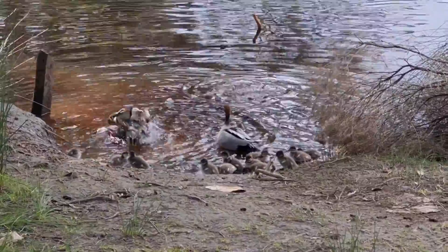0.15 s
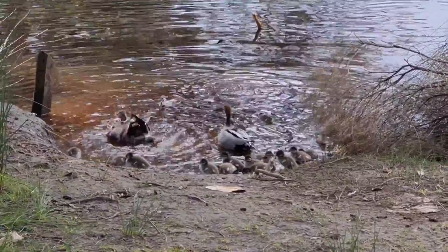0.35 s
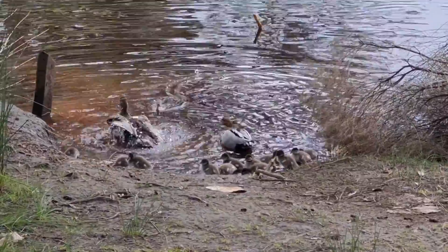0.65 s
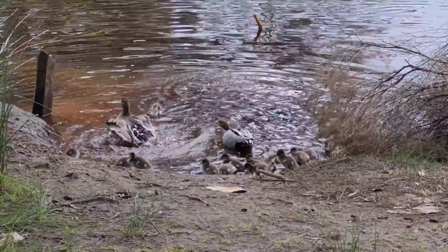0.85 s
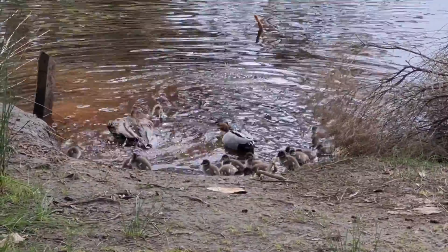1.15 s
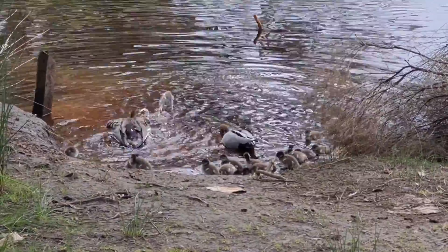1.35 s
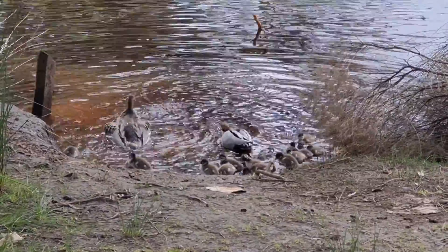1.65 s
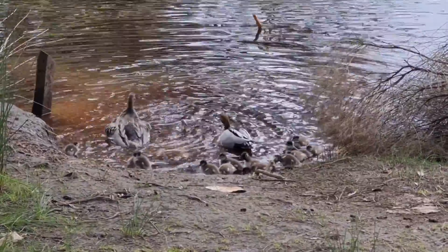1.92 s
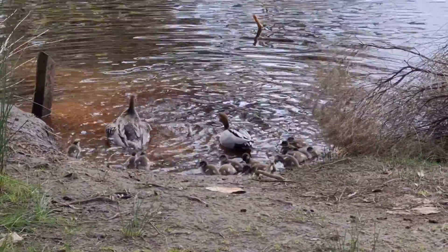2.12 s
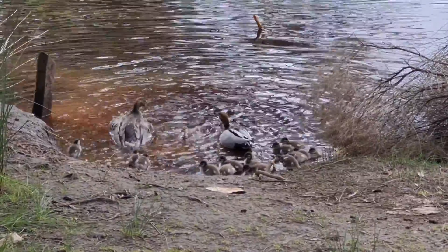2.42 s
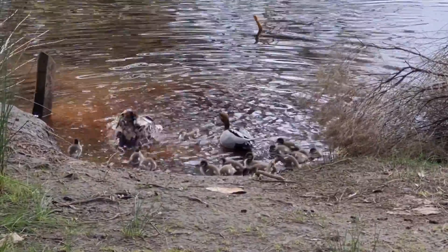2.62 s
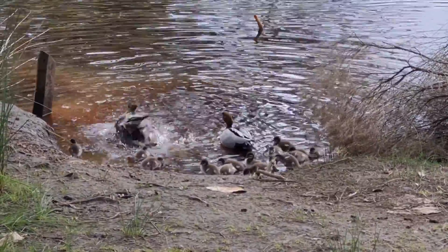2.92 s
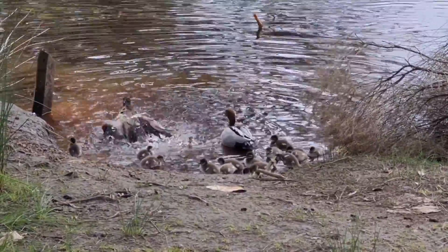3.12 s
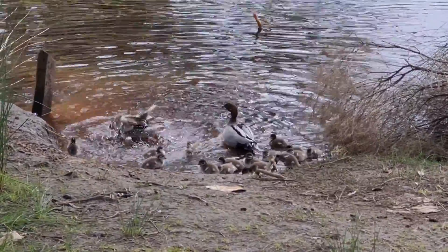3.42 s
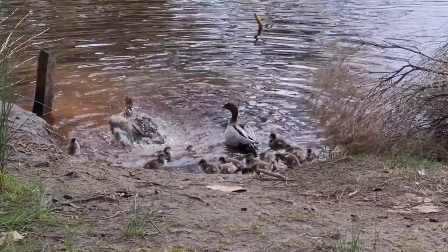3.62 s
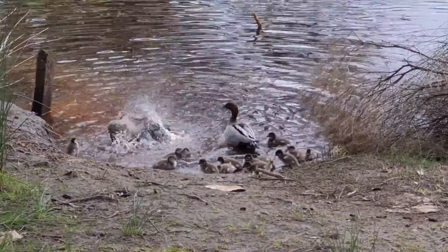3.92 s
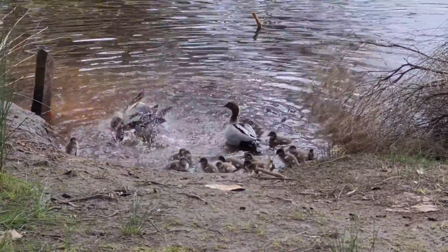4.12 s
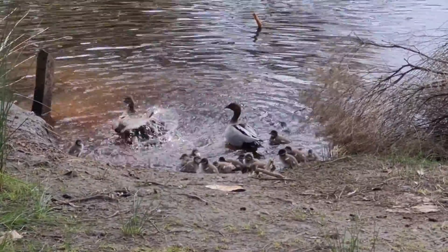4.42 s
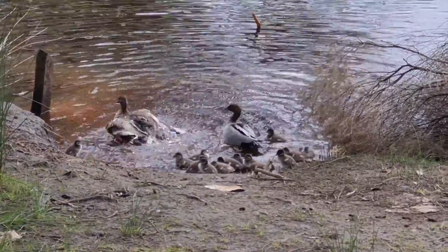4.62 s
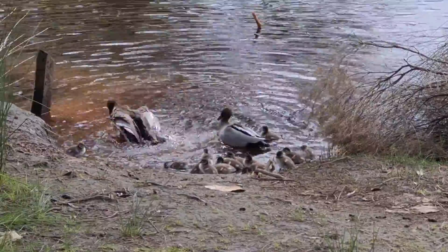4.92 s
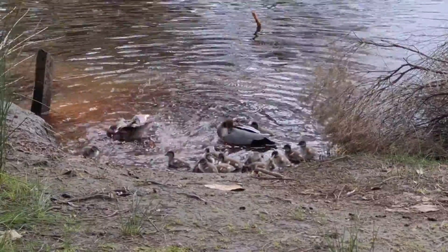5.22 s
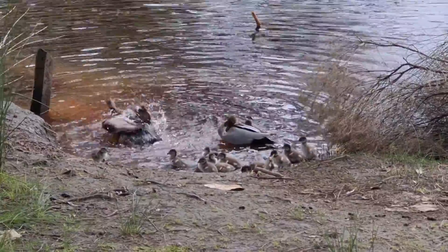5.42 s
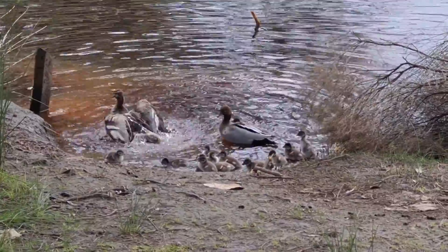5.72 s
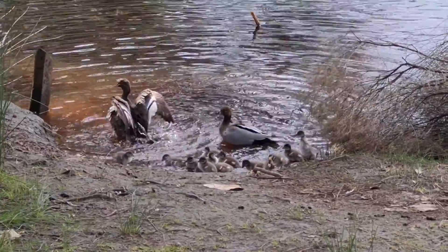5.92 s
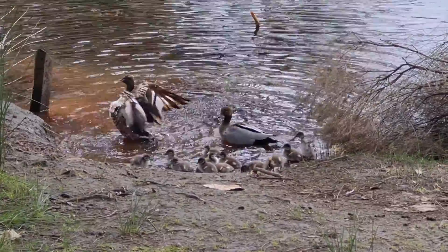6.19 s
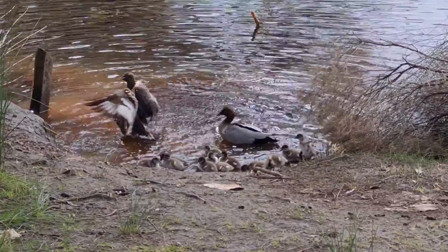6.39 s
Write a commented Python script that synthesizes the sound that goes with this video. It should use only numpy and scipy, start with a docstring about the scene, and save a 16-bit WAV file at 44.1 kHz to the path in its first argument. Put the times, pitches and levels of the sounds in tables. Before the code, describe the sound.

A distant motor vehicle pulls away, changes gear and drones on while a duck splashes, slaps and flaps its wet wings in shallow water.

```python
"""Duck bathing at a pond's edge

A duck bathes: enveloped noise makes slosh and spray, slaps pair noise bursts with ringing air pockets.
Drips are ringing bubbles, ducklings peep as gliding sines, and wet feathers swish and sizzle as shaped noise.
Far off a motor vehicle pulls away, changes gear and drones on: summed engine orders over a rush of gas.
Its road and tyre noise fade, over distant traffic rumble and rustling reeds, all coloured noise.
The duck reaches the left channel first, while the right channel is more sensitive to much of the treble."""
import sys
import numpy as np
from scipy import signal
from scipy.fft import rfft, irfft
from scipy.io import wavfile

SR = 44100
rng = np.random.default_rng(int(sys.argv[2]) if len(sys.argv) > 2 else 0)


def generate_wav(signal):
    """Clip the signal to [-1, 1] and save it as 16-bit WAV at the path in sys.argv[1]."""
    frames = np.transpose(np.atleast_2d(signal))
    scaled = np.clip(frames, -1, 1) * 32767
    pcm = np.round(scaled).astype(np.int16)
    wavfile.write(sys.argv[1], SR, pcm)


N = 288855
TIME = np.arange(N) / SR


def amp(db):
    """Decibels to gain."""
    return 10 ** (np.asarray(db) / 20)


def unit(x):
    """Scales to rms 1."""
    return x / np.sqrt(np.mean(np.abs(x) ** 2) + 1e-20)


def follow(rows):
    """Each column of a curve table at every sample."""
    times, *columns = np.transpose(rows)
    return [np.interp(TIME, times, column) for column in columns]


def at_hz(points, hz):
    """Reads a spectrum on a log-frequency axis."""
    f, value = np.transpose(points)
    return np.interp(np.log(hz + 1), np.log(f), value)


def colour(x, tone):
    """Filters by a spectrum, keeping the power of white noise."""
    gain = unit(amp(at_hz(tone, np.fft.rfftfreq(N, 1 / SR))))
    return irfft(rfft(x) * gain, N)


def add(mix, s, sound):
    """Mixes a sound in at time s."""
    part = mix[..., max(round(s * SR), 0):][..., :sound.shape[-1]]
    part += sound[..., :part.shape[-1]]


def bell(s, length):
    """A soft rise and fall around time s."""
    return np.exp(-(2 * (TIME - s) / length) ** 2)


def swells(rows):
    """Soft bell-shaped bursts as one gain curve."""
    return sum(amp(db) * bell(s, length) for s, db, length in rows)


def drift(per_s):
    """Smooth random wandering of rms 1."""
    count = N // 100 + 2  # drawn once every 100 samples
    hz = np.fft.rfftfreq(count, 100 / SR)
    slow = irfft(rfft(rng.standard_normal(count)) * np.exp(-(hz / per_s) ** 2))
    return unit(np.interp(np.arange(N) / 100, np.arange(len(slow)), slow))


def lean(right_db):
    """Channel gains that set the right side this many dB above the left."""
    return amp(np.array([[-.5], [.5]]) * right_db)


PORT_LAG, ENGINE_LAG = 23, 14  # delay of the right channel for the duck and the engine [samples]


def ports(x, lag=PORT_LAG):
    """Sound from the left reaches the right port some samples later."""
    return np.array([x, np.pad(x, (lag, 0))[:N]])


# Stereo width of sound from all around: (frequency [Hz], likeness of the two channels [0 to 1])
CHANNEL_LIKENESS = [(60, 0.85), (130, 0.82), (290, 0.78), (640, 0.67), (1400, 0), (16000, 0)]


def air(tone):
    """Sound from all around: alike in both channels in the bass, unrelated in the treble."""
    a, b = rfft(rng.standard_normal((2, N)))
    same = np.clip(at_hz(CHANNEL_LIKENESS, np.fft.rfftfreq(N, 1 / SR)), -1, 1)
    pair = np.array([a, same * a + np.sqrt(1 - same ** 2) * b])
    return colour(irfft(pair, N), tone)


def patter(per_s, spread_db):
    """Droplet impacts at random moments and of unequal size, rms 1."""
    size = amp(spread_db * np.minimum(rng.exponential(1, N), 4))
    lands = rng.random(N) < per_s / SR
    return unit(size * rng.standard_normal(N) * lands)


def hiss(tone, per_s, spread_db, wet_db):
    """Dense tiny impacts: one share comes straight from the duck, the rest is scattered to each port on its own."""
    scattered = np.array([patter(per_s, spread_db), patter(per_s, spread_db)])
    direct = ports(patter(per_s, spread_db))
    return unit(colour(direct + amp(wet_db) * scattered, tone))


def bubble(hz, cycles, rise):
    """A pocket of air rings down, its pitch rising as it nears the surface."""
    age = np.arange(4000) / SR * hz / cycles  # in decay times
    ring = np.sin(2 * np.pi * cycles * (age + rise * age ** 2 / 2))
    return ring * np.exp(-age) * (1 - np.exp(-10 * age))


def throttle(pull, rise_s):
    """Drive builds as the throttle opens, holds, and dies back when it eases off."""
    opens, eases, _, _, ease_s, left = pull
    attack = 1 - np.exp(-(np.maximum(TIME - opens, 0) / rise_s) ** 2)
    return attack * (left + (1 - left) * np.exp(-np.maximum(TIME - eases, 0) / ease_s))


# Engine speed, climbing in low gear and sagging through the change: (time [s], crank speed [turns per s])
CRANK_SPEED = [(0, 50.75), (2.3, 60.2), (2.5, 55), (2.8, 46), (3.5, 38.8), (4.7, 39.3), (6.55, 39.1)]
# Brief dips in the drone: (middle [s], boom depth [dB], rasp depth [dB], length [s])
DRONE_DIPS = [(.41, 3, 5, .06), (.85, 4, 3, .07), (1.25, 15, 2, .09), (1.47, 4, 1, .07), (1.8, 5, 3, .22),
              (2.4, 13, 4, .12), (3.52, 11, 8, .07), (3.93, 8, 0, .45), (5.27, 8, 6, .12)]
# Rush of exhaust gas: (frequency [Hz], relative level [dB per Hz])
GAS_TONE = [(40, -23.5), (80, 3.5), (200, 0.5), (340, 2), (420, -13.5), (520, -22.5), (900, -54.5)]
# Low-gear drone swings at an even rate; a crest falls at THROB_CREST_S
THROB_DB, THROB_PER_S, THROB_CREST_S = 1.7, 6.8, .335
# Random flutter of the drone in both gears
FLUTTER_DB, FLUTTER_PER_S = .7, 12
# How fast boom and rasp follow the opening throttle [s]
BOOM_RISE_S, RASP_RISE_S = .08, .32
# Extra rasp while the vehicle passes closest
NEAR_RASP_DB, NEAREST_S, NEAR_S = 9.8, .22, .9


def exhaust(pull, orders, throb, puff_db, waver):
    """Engine orders add up to exhaust pulses, wavering on their long way through the air, over the rush of gas."""
    _, _, boom_db, rasp_db, _, _ = pull
    throb_db = throb * THROB_DB * np.cos(2 * np.pi * THROB_PER_S * (TIME - THROB_CREST_S))
    sway_db = throb_db + FLUTTER_DB * drift(FLUTTER_PER_S)
    boom_dip_db, rasp_dip_db = sum(np.outer(depths, bell(s, length)) for s, *depths, length in DRONE_DIPS)
    boom = throttle(pull, BOOM_RISE_S) * amp(boom_db + sway_db - boom_dip_db)
    near_db = NEAR_RASP_DB * bell(NEAREST_S, NEAR_S)
    rasp = throttle(pull, RASP_RISE_S) * amp(rasp_db + near_db + .6 * sway_db - rasp_dip_db)

    turns = np.cumsum(follow(CRANK_SPEED)[0] * (1 + 0.005 * drift(17))) / SR
    multiples, order_db = np.transpose(orders)
    sizes = amp(order_db)
    low = multiples < np.pi  # up to the third order
    hum = np.zeros(N)
    for multiple, size, is_low in zip(multiples, sizes, low):
        share = size / np.linalg.norm(sizes[low == is_low])
        scatter = 1 + waver * (1.1 - share) * (drift(6) + 1j * drift(4.8))  # weak orders waver most
        uneven = 1j ** (round(multiple) % 2)  # odd orders come from unevenly spaced firings
        wave = (uneven * scatter * np.exp(2j * np.pi * multiple * turns)).real
        hum -= np.sqrt(2) * share * (boom if is_low else rasp) * wave
    return ports(hum, ENGINE_LAG) + amp(puff_db) * rasp * air(GAS_TONE)


# Exhaust tone in each gear: (multiple of the crank speed [ratio], relative level [dB])
LOW_GEAR_ORDERS = [(1, -36.5), (2, -2), (3, -13.5), (4, -3), (5, -18), (6, -9.5), (7, -27.5), (8, -27)]
HIGH_GEAR_ORDERS = [(1, -25), (2, -5), (3, -16), (4, 1.5), (5, -41.5), (6, -14), (7, -33.5), (8, -29.5),
                    (9, -36), (10, -23.5)]
# One pull in each gear: (throttle opens [s], eases off [s], boom of the low orders [dB],
# rasp of the higher orders [dB], dying back [s], drive left [share])
LOW_GEAR_PULL = (-1, 2.23, -29.3, -38.9, .21, .005)
HIGH_GEAR_PULL = (3.23, 4.74, -39.1, -37.5, .17, .22)


def engine():
    """The exhaust drives in low gear, dies back for the change, then drones in high gear."""
    pulling = exhaust(LOW_GEAR_PULL, LOW_GEAR_ORDERS, throb=1, puff_db=-8.5, waver=.3)
    droning = exhaust(HIGH_GEAR_PULL, HIGH_GEAR_ORDERS, throb=0, puff_db=-15, waver=.55)
    return (pulling + droning) * lean(.7)


# Traffic rumble: (frequency [Hz], relative level [dB per Hz])
TRAFFIC_TONE = [(20, -31.5), (35, -33), (59, 0), (78, -7), (110, -3), (170, -8), (290, -9), (400, -19),
                (600, -21.5), (1200, -79.5)]
# Level when far, extra level while near, and how long that lasts
RUMBLE_DB, NEAR_RUMBLE_DB, RECEDE_S = -47.8, 8, 2.9


def rumble():
    """Distant traffic is low noise that settles as it recedes."""
    level_db = RUMBLE_DB + NEAR_RUMBLE_DB * bell(0, 2 * RECEDE_S) + .7 * drift(6)
    return amp(level_db) * air(TRAFFIC_TONE) * lean(.7)


# Road noise: (frequency [Hz], relative level [dB per Hz])
ROAD_COLOUR = [(200, -1), (400, -9), (520, -12), (620, -2), (750, 3.5), (1000, -4), (1300, -0.5),
               (1600, -26), (2500, -34), (5000, -56.5)]
ROAD_DB, ROAD_FADE_DB_PER_S = -46.8, 1.55  # level at the start, steady fade


def road():
    """Road noise is mid-range noise that fades steadily, with a slight random wander."""
    level_db = ROAD_DB - ROAD_FADE_DB_PER_S * TIME + .32 * drift(14)
    return amp(level_db) * air(ROAD_COLOUR) * lean(1.1)


# Tyre hiss: (frequency [Hz], relative level [dB per Hz])
TYRE_COLOUR = [(700, -18.5), (1200, 8), (1420, 4), (1620, -1.5), (2900, -4), (3700, -10), (4600, -11),
               (5600, -18), (7200, -21.5), (9500, -48), (16000, -44.5)]
# Level at the start and slow fade; from TYRES_GONE_S a quick fade adds to it
TYRE_DB, TYRE_FADE_DB_PER_S, TYRES_GONE_S, TYRE_GONE_DB_PER_S = -51.7, 1.7, 2.1, 25


def tyres():
    """Tyre hiss is bright noise that fades slowly, then quickly as the vehicle leaves earshot."""
    gone_db = TYRE_GONE_DB_PER_S * np.maximum(TIME - TYRES_GONE_S, 0)
    level_db = TYRE_DB - TYRE_FADE_DB_PER_S * TIME - gone_db
    return amp(level_db + .5 * drift(19)) * air(TYRE_COLOUR) * lean(6.3)


# Rustle of reeds and leaves: (time [s], level [dB])
RUSTLE_LEVEL = [(0, -65), (2.7, -61.5), (3.2, -67), (4.5, -60.7), (6.55, -60.3)]
# Its colour: (frequency [Hz], relative level [dB per Hz])
RUSTLE_COLOUR = [(700, -18), (1500, 3.5), (2200, 4.5), (3200, -3), (4200, -11.5), (5200, -18.5),
                 (6800, -19.5), (8200, -32), (12000, -30.5), (15500, -25.5)]


def rustle():
    """Reeds and leaves brush together as wavering noise, mostly on the right."""
    return amp(follow(RUSTLE_LEVEL)[0] + 1.2 * drift(16)) * air(RUSTLE_COLOUR) * lean(9)


# Bouts of bathing that stir the water: (middle [s], level [dB], length [s])
BATHING_BOUTS = [(.55, -74, .3), (1.45, -83, .2), (3.05, -76.5, .3), (4, -67.5, 1.35)]
CALM_DB = -93  # stirring between the bouts


def stir():
    """How strongly the water moves: calm, with a swell for each bout of bathing."""
    return amp(CALM_DB) + swells(BATHING_BOUTS)


# Churning water: (frequency [Hz], relative level [dB per Hz])
SLOSH_COLOUR = [(200, -14), (500, 1), (800, 11), (1400, 0), (2300, -1.5), (3500, -7), (4600, -16.5),
                (7000, -15), (9000, -37)]


def slosh():
    """Stirred water laps and churns around the duck, and tiny bubbles burst in it."""
    bubbles = np.zeros(N)
    for hz in np.geomspace(700, 3500, 12):
        bursts = patter(per_s=45, spread_db=2.5)
        bubbles += unit(signal.oaconvolve(bursts, bubble(hz, cycles=2, rise=.02))[:N])
    wash = hiss(SLOSH_COLOUR, per_s=2500, spread_db=-0.5, wet_db=6.5)
    level = stir() ** .8 * amp(1.2 * drift(25))  # the power evens out calm and bouts
    return level * (wash + amp(-6.5) * ports(unit(bubbles)))


# Single bubbles and drips: (time [s], level [dB], starting pitch [Hz])
PLINKS = [(.195, -54, 4430), (.474, -48, 6260), (0.714, -55, 8200), (1.412, -45, 2500),
          (1.476, -50.5, 4350)]


def drips():
    """Larger drops plink into the pond, each a ringing bubble of rising pitch."""
    out = np.zeros(N)
    for s, db, hz in PLINKS:
        add(out, s, amp(db) * bubble(hz, cycles=14, rise=.05))
    return out


# Fine spray shaken from the feathers: (middle [s], relative level [dB], length [s])
FEATHER_FLICKS = [(.335, -72, .05), (.5, -72, .075), (.68, -73, .09), (.835, -77, .06), (2.96, -72, .1),
                  (3.1, -70, .07), (5.3, -73, .07), (5.425, -71, .07), (5.8, -75, .07), (5.925, -74, .05),
                  (6.22, -80, .08)]
# Spray: (frequency [Hz], relative level [dB per Hz])
SPRAY_COLOUR = [(300, -25), (900, -12), (1500, -7.5), (2400, 1), (3400, -5), (4400, -1.5), (5600, -7),
                (6800, 0.5), (8200, -10.5), (11000, -5), (14000, -0.5), (16000, 1)]
# The spray of every slap rises quickly and rains down, falling 60 dB in SPRAY_T60 seconds
SPRAY_RISE_S, SPRAY_T60 = .0035, .26
# Before each slap the wing scoops through the water; level is against that slap's spray
SCOOP_DB, SCOOP_AHEAD_S, SCOOP_S = -12.5, .015, .055


def spray():
    """Each slap throws up a sheet of water that breaks into mist and larger drops; more fall from shaken feathers."""
    thrown, t = np.zeros(N), np.arange(SR // 2) / SR
    scoops = []
    for s, _, spray_db, _, _ in WATER_SLAPS:
        add(thrown, s, amp(spray_db - 60 * t / SPRAY_T60) * (1 - np.exp(-t / SPRAY_RISE_S)))
        scoops.append((s - SCOOP_AHEAD_S, spray_db + SCOOP_DB, SCOOP_S))
    falling = np.sqrt(thrown ** 2 + swells(scoops) ** 2 + swells(FEATHER_FLICKS) ** 2 + stir() ** 2)
    mist = hiss(SPRAY_COLOUR, per_s=6700, spread_db=-1.5, wet_db=12.5)
    drops = amp(-1.5) * hiss(SPRAY_COLOUR, per_s=450, spread_db=3.8, wet_db=-3)
    return falling * amp(2.2 + 1.1 * drift(90)) * (mist + drops)


# Wing and body slaps on the water: (time [s], relative crack level [dB], relative spray level [dB],
# air pocket level [dB], air pocket pitch [Hz])
WATER_SLAPS = [(3.2166, -32.5, -62, -46, 1000), (3.367, -38, -60, -50, 2400), (3.472, -41, -73, -55, 3100),
               (3.605, -44, -59, -42, 1500), (3.694, -40, -60, -35, 1090), (3.7078, -14, -51.5, -25, 680),
               (3.8215, -27.5, -48.5, -33, 1050), (3.9307, -18, -48.5, -17.5, 1325),
               (4.0412, -21.5, -51.5, -28.5, 1080), (4.176, -48, -55, -52, 1210),
               (4.261, -38, -56, -44, 2020), (4.307, -35, -62, -55, 1400), (4.3895, -17, -48.5, -31.5, 780),
               (4.567, -36, -65, -39, 2200), (5.565, -39, -63, -44, 2020), (5.594, -37, -72, -37, 2950),
               (5.631, -40, -76, -43, 5240)]
# Crack of a slap: (frequency [Hz], relative level [dB per Hz])
CRACK_TONE = [(150, 0), (400, 7), (750, 9.5), (1000, 10), (1450, -0.5), (2050, -17), (2700, 10.5),
              (3300, 8), (3900, 0.5), (4500, -1), (5700, -5.5), (7000, -1.5), (9500, -14), (15000, -3)]


def slaps():
    """A wing hits the water: a sharp crack, a dull plunge, and a gulp as the trapped air rings and breaks up."""
    cracks, plunges, gulps = np.zeros((3, N))
    t = np.arange(4000) / SR
    sharp, slow = t / .00003, t / 0.00094
    click = (1 - sharp) * np.exp(-sharp)
    thump = (1 - slow) * np.exp(-slow)
    crackle = (np.exp(-t / 0.0019) + 0.1 * np.exp(-t / 0.01)) * (1 - np.exp(-t / 0.00022))
    for s, crack_db, _, pocket_db, pocket_hz in WATER_SLAPS:
        add(cracks, s, amp(crack_db - 10.5) * rng.standard_normal(len(t)) * crackle)
        add(cracks, s + .0006, amp(crack_db + 3) * click)
        depth = amp(pocket_db) * (700 / pocket_hz) ** 1.7  # a large, low pocket means a deep blow
        add(gulps, s + 0.00066, amp(1.5) * depth * thump)
        add(plunges, s, amp(-7.5) * depth * rng.standard_normal(len(t)) * np.exp(-t / 0.01))
        add(gulps, s + 0.00018, amp(pocket_db) * bubble(pocket_hz, cycles=2.4, rise=0.018))
        for late, smaller in rng.random((12, 2)):  # the pieces of the pocket ring later and higher
            piece_hz = pocket_hz * (1.05 + .7 * smaller + .35 * late)
            piece = bubble(piece_hz, cycles=1.8, rise=.02)
            add(gulps, s + 0.0032 + .03 * late, amp(pocket_db - 13 - 3 * late) * piece)
    plunge_tone = [(100, -14.5), (260, -2), (450, 1.5), (800, -1), (1000, -13), (2000, -28.5)]
    return colour(cracks, CRACK_TONE) + colour(plunges, plunge_tone) + gulps


# Duckling peeps: (start [s], relative level [dB], start pitch [Hz], end pitch [Hz], length [s])
DUCKLING_PEEPS = [(3.292, -56, 2950, 2750, .035), (3.33, -58, 2600, 2300, .045),
                  (5.063, -62, 3540, 3320, .065)]


def ducklings():
    """Thin, quavering, slightly falling peeps, each a gliding sine."""
    out = np.zeros(N)
    for s, db, start_hz, end_hz, length in DUCKLING_PEEPS:
        hz = np.linspace(start_hz, end_hz, round(length * SR))
        tone = np.sin(2 * np.pi * np.cumsum(hz) / SR)
        add(out, s, amp(db) * np.hanning(len(hz)) * tone)
    return out * amp(-2 + 4 * drift(60))


# Wet feathers sizzling as they shed water: (middle [s], level [dB], length [s])
FEATHER_SIZZLES = [(4.83, -73, .1), (4.96, -73, .11)]
# Feathers swishing through the air: (middle [s], level [dB], length [s])
FEATHER_SWISHES = [(5.433, -65, .074), (5.79, -57, .082), (6.325, -56.5, .077), (6.43, -60, .039),
                   (6.528, -55, .17)]


def wings():
    """Wet feathers brush the air in short strokes and shed water."""
    swish_tone = [(300, -2), (1200, 12), (2300, 14.5), (3500, -2), (5000, -8), (7000, -16), (8500, -28), (15000, -32)]
    sizzle_tone = [(3000, -15), (5500, -7), (7000, 1), (8300, 0), (9500, -10), (11000, -18)]
    swish = swells(FEATHER_SWISHES) * hiss(swish_tone, per_s=11000, spread_db=-4.5, wet_db=7)
    sizzle = swells(FEATHER_SIZZLES) * hiss(sizzle_tone, per_s=6000, spread_db=.8, wet_db=5.0)
    return swish + sizzle


def bank(x, wet_db, t60):
    """Moving water, bank and reeds scatter a sound back through four echo patterns that take turns."""
    t, echo = np.arange(SR // 4) / SR, np.zeros((2, N))
    for k in range(4):
        taps = rng.choice([-1., 1.], (2, len(t))) * (rng.random((2, len(t))) < 6000 / SR)
        taps *= amp(-60 * t / t60) * (t > .0015)
        taps /= np.linalg.norm(taps, axis=1, keepdims=True)
        turn = np.maximum(np.cos(2 * np.pi * (TIME * 1.6 - k / 4)), 0)  # 1.6 rounds per second
        echo += signal.oaconvolve((x * turn)[None], taps, axes=1)[:, :N]
    return ports(x) + amp(wet_db) * echo


# The right port's extra sensitivity to the duck: (frequency [Hz], share of the full lead [ratio])
RIGHT_PORT_LEAD = [(500, -0.038), (1300, 1), (2400, 0.82), (4400, 1), (6500, 0.91), (8500, -0.53),
                   (11000, -0.19), (15000, .2)]


def scene():
    """The duck and her brood in front of the vehicle, distant traffic and rustling bank."""
    duck = bank(slaps() + drips() + ducklings(), wet_db=-4.5, t60=.17)
    duck += spray() + slosh() + wings()
    right_db = 9 * at_hz(RIGHT_PORT_LEAD, np.fft.rfftfreq(N, 1 / SR))  # full lead 9 dB
    distance = engine() + rumble() + road() + tyres() + rustle()
    return irfft(rfft(duck) * lean(right_db), N) + distance


EDGE_HZ = 15900  # upper band limit


def record(dry):
    """A soft start and stop, and a steep low-pass band limit."""
    dry = dry * signal.windows.tukey(N, .0012)
    low_pass = signal.firwin(511, EDGE_HZ, window=("kaiser", 9), fs=SR)
    return signal.oaconvolve(dry, low_pass[None], "same")


dry = scene()
out = record(dry)
generate_wav(out)
```